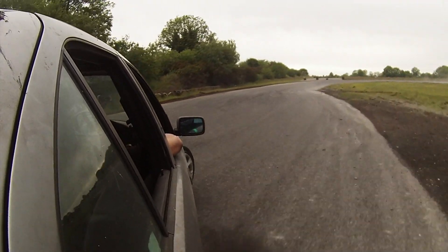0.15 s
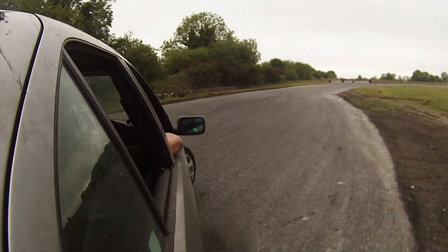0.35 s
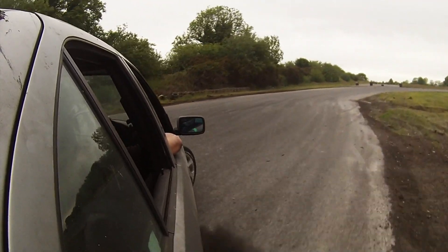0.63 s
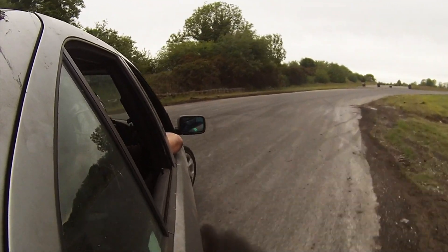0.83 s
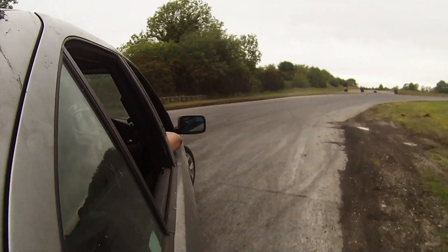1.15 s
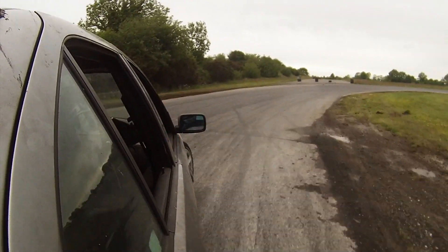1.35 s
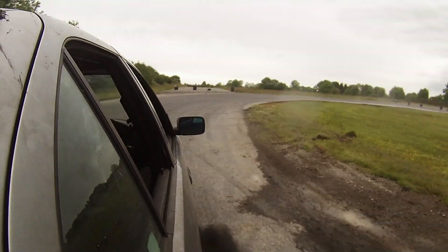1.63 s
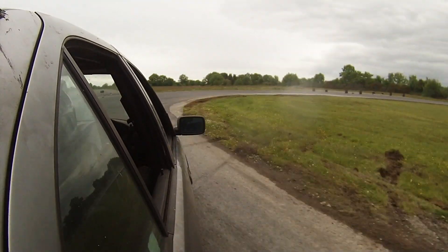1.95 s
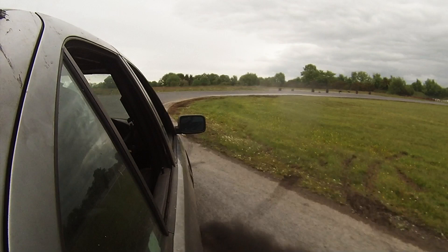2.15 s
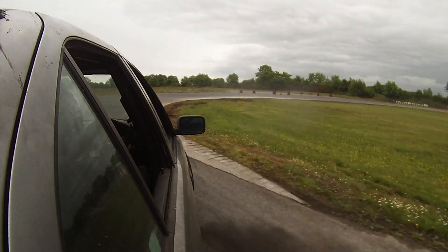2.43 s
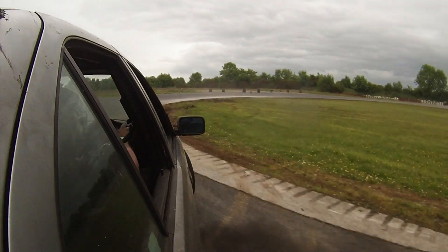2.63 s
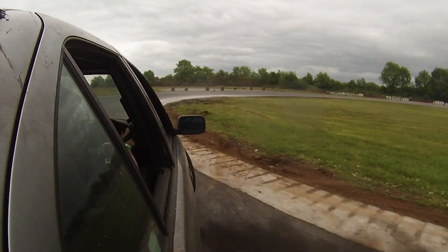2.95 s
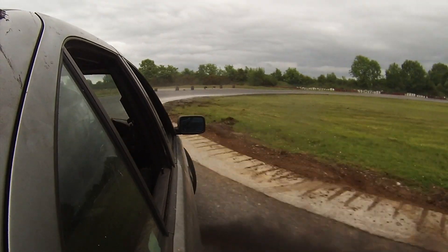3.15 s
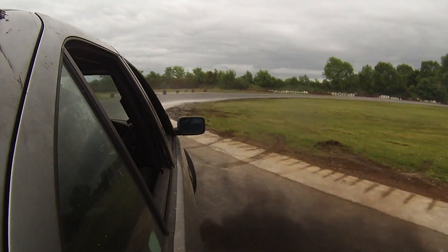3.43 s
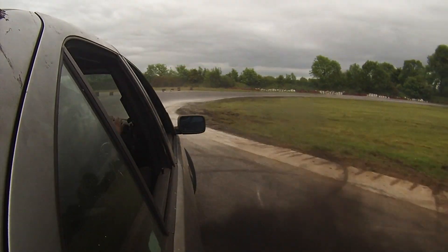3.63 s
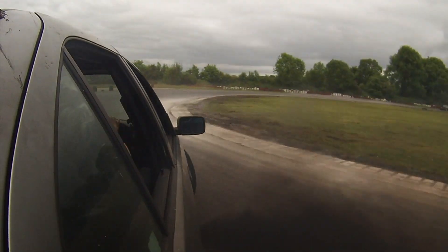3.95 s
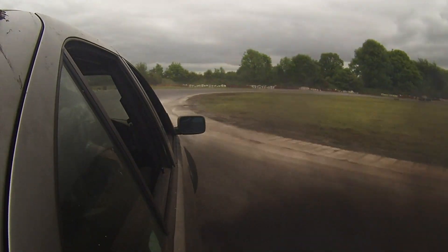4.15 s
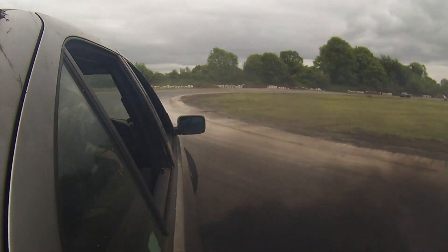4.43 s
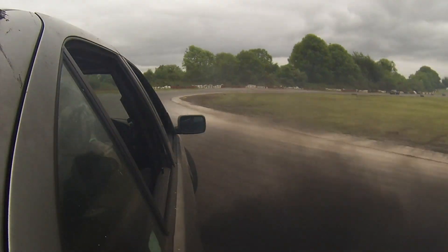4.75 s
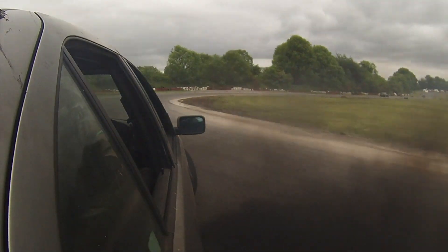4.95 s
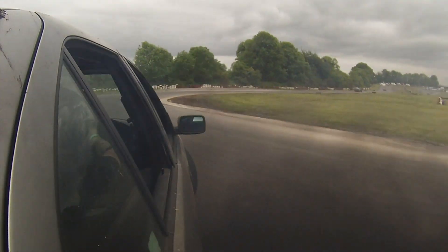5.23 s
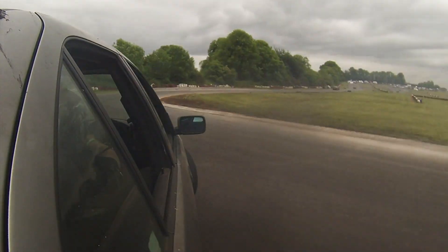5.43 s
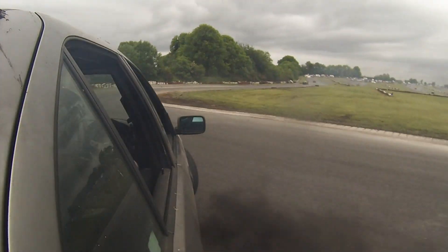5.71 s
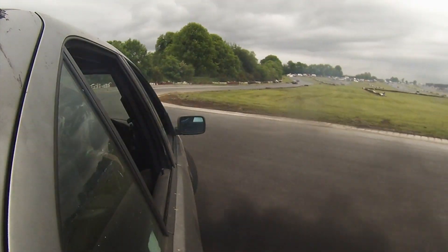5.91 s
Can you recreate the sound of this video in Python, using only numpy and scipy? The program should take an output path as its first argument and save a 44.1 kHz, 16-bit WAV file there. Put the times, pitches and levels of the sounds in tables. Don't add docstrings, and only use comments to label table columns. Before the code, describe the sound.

Close to a sliding car: long harsh tyre squeal, brief grip with squeaks as the diesel drops, then pulsing squeals over engine roar.

```python
import sys
import numpy as np
from scipy import signal
from scipy.fft import rfft, irfft, next_fast_len
from scipy.io import wavfile
from scipy.ndimage import uniform_filter1d

SR = 44100
rng = np.random.default_rng(int(sys.argv[2]) if len(sys.argv) > 2 else 0)


def elevation(decibels):
    levels = np.asarray(decibels, float)
    return 10 ** (levels / 20)


def wav_record(signal):
    frames = np.transpose(np.atleast_2d(signal))
    bounded = np.clip(frames, -1, 1)
    quanta = np.round(bounded * 32767).astype(np.int16)
    wavfile.write(sys.argv[1], SR, quanta)


N = 268128
TIME_S = np.arange(N) / SR


def columns(rows):
    s, *cols = np.transpose(rows)
    return [np.interp(TIME_S, s, c) for c in cols]


def bell(s, length):
    return np.exp(-((TIME_S - s) / length) ** 2)


def sounding(rows):
    inside = 1. * (TIME_S >= rows[0][0]) * (TIME_S <= rows[-1][0])
    return uniform_filter1d(inside, size=900)


def noise():
    return rng.standard_normal(N)


def rms_one(x):
    return x / np.sqrt(np.mean(x ** 2) + 1e-20)


def drift(rate_hz):
    r = np.exp(-2 * np.pi * rate_hz / SR)
    settled = signal.lfilter([1], [1, -2 * r, r * r], rng.standard_normal(N + SR))[SR:]
    return rms_one(settled)


def colour(x, spectrum):
    hz, db = np.transpose(spectrum)
    size = next_fast_len(N)
    log_hz = np.log(np.arange(size // 2 + 1) * SR / size + 1)
    gain = elevation(np.interp(log_hz, np.log(hz), db, -120, -120))
    return rms_one(irfft(rfft(x, size) * gain, size)[:N])


def resonance(x, hz, width_hz):
    r = np.exp(-np.pi * width_hz / SR)
    zeros = np.array([1, 0, -1]) * (1 - r * r) / 2
    return signal.lfilter(zeros, [1, -2 * r * np.cos(2 * np.pi * hz / SR), r * r], x)


def ringing(hz, width_hz):
    return rms_one(resonance(resonance(noise(), hz, width_hz), hz, width_hz))


def channel_difference():
    # f/Hz, level/dB per Hz
    spectrum = [(20, 17), (200, -5), (700, -13.0), (1400, -1), (4000, -25.5), (13000, -28)]
    return elevation(-51 + 3.5 * drift(14.4)) * colour(noise(), spectrum)


# f/Hz, width/Hz, level/dB
PANEL_MODES = [(61.5, 4.2, -6.5), (76.9, 3.06, 2), (90, 10, -6.5), (125.5, 20.3, -5.5), (143, 7.9, -7),
               (210.3, 50, -14)]
# t/s, length/s, extra buffeting level/dB, extra boom level/dB
BUMPS = [(0, 0.051, 12, 4), (0.208, .1, -4, 3), (0.484, 0.03, 10.5, 7), (0.851, 0.11, -5, -0.5),
         (1.05, 0.045, 4.5, 3), (1.526, 0.097, 8, 5.5), (1.305, 0.088, 4.5, 5.5), (1.792, 0.1, 10.5, 3),
         (2.003, 0.16, 4.5, 3), (2.4, 0.14, 6, 2.5), (3.02, 0.14, 6, 6), (3.45, .08, 8.5, -1),
         (3.921, 0.068, 1.5, 5), (4.114, 0.13, 8.5, 1), (4.549, .12, 1, 3), (4.9, 0.17, 3.5, -0.5),
         (5.3, 0.12, -4, -2.5), (5.75, 0.05, -6, 5.5)]


def bodywork():
    buffet_db = -25.5 + sum(db * bell(s, length) for s, length, db, _ in BUMPS)
    boom_db = -24.5 + sum(db * bell(s, length) for s, length, _, db in BUMPS)
    boom = rms_one(sum(elevation(db) * ringing(hz, 2.5 * width_hz) for hz, width_hz, db in PANEL_MODES))
    buffet = ringing(22.7, 2.5 * 6) + 0.28 * ringing(39.0, 2.5 * 17.5)
    return boom * elevation(boom_db + 1.0) + buffet * elevation(buffet_db + 1.5)


MEAN_LOAD_DB = -40.5
# t/s, level/dB
LOAD = [(0, -31.5), (.5, -35.5), (1.0, -35.5), (1.12, -45.5), (1.4, -58.5), (1.62, -52.5), (1.75, -39),
        (1.86, -55.5), (2.25, -43), (2.75, -39.5), (2.95, -39.5), (3.15, -37.5), (3.47, -43), (3.95, -39),
        (4.35, -42), (4.95, -42.5), (5.55, -50), (6.08, -45.5)]
# t/s, length/s, extra load level/dB
SURGES = [(2.44, 0.042, 1.5), (2.74, 0.056, 3), (3.288, .04, 4), (3.629, 0.051, 4), (3.92, .05, 3.5),
          (4.149, 0.028, 0), (4.674, 0.049, 4), (4.97, 0.047, 5), (5.319, 0.045, 0), (5.88, .1, 0.5)]


def load():
    return columns(LOAD)[0] + sum(db * bell(s, length) for s, length, db in SURGES)


# t/s, firing f/Hz, first order level/dB
FIRING = [(0, 190.7, -27), (.25, 173.6, -32.5), (1.05, 162.7, -29), (1.17, 152.3, -38), (1.5, 120.6, -51),
          (1.57, 121.1, -27.5), (1.82, 126, -29.5), (1.92, 129.3, -47), (2.15, 141.4, -21),
          (2.3, 144.9, -20), (2.45, 150.5, -26), (2.7, 165.5, -28.5), (3.1, 165.9, -26), (3.95, 174.2, -26),
          (4.5, 165.5, -26), (5.3, 162.6, -27), (5.65, 143, -23.5), (6.08, 146, -24.5)]
# multiple of the firing rate, level under the first order/dB
OTHER_ORDERS = [(.5, -14), (11 / 6, -16.5), (3, -23.5)]


def engine_orders(cycles):
    firing_hz, first_db = columns(FIRING)
    second_db = -40 + 0.64 * (first_db + 28) - 0.23 * (firing_hz - 150)
    tones = elevation(first_db) * np.sin(2 * np.pi * cycles) + elevation(second_db) * np.sin(4 * np.pi * cycles + 1)
    for multiple, db in OTHER_ORDERS:
        tones += elevation(first_db + db + 2.0 * drift(10.0)) * np.sin(2 * np.pi * multiple * cycles)
    return np.sqrt(2) * tones


# f/Hz, level/dB per Hz
CLATTER = [(2350, -36), (4000, 2), (4370, -2.5), (4740, 0.5), (5800, -7.5), (6240, 4.5), (6570, 5.5),
           (7670, -2), (9570, -12), (10200, -4.5), (10500, -5), (11300, -11.5), (12700, -15.5),
           (13700, -24.5)]


def clatter(cycles, puff, load_db):
    surge_db = 1.1 * drift(13)
    total = 0
    for kind, edge_hz in ("low", 5900), ("band", [5900, 9400]), ("high", 9400):
        strength = elevation(rng.normal(0, 4.2, 1500))[cycles.astype(int)]
        gate = .8 + .75 * strength * puff
        part = colour(gate * noise(), CLATTER) * elevation(load_db + surge_db + 1.74 * drift(31))
        total = total + signal.sosfilt(signal.butter(4, edge_hz, kind, fs=SR, output="sos"), part)
    return total


# f/Hz, level/dB per Hz
ROAR = [(110, -54), (190, 2.5), (236, -8.5), (318, -8.5), (383, -12.5), (459, -13), (650, -20),
        (747, -10.5), (823, -19.5), (1000, -19), (1300, -34), (2200, -120)]


def exhaust_roar(puff, load_db):
    roar_db = -38.5 + 0.3 * (load_db - MEAN_LOAD_DB)
    return colour((0.5 + puff) * noise(), ROAR) * elevation(roar_db + 7.5)


def engine():
    cycles = np.cumsum(columns(FIRING)[0]) / SR
    puff = np.sin(np.pi * cycles) ** 2
    load_db = load()
    orders = engine_orders(cycles)
    bright = clatter(cycles, puff, load_db)
    roar = exhaust_roar(puff, load_db)
    return orders * elevation(1.5 * drift(8)) + bright + roar


# t/s, scrub level/dB
SLIDE = [(0, -25.5), (.3, -25.5), (.9, -28.5), (1.17, -24), (1.43, -31), (1.56, -37.5), (1.63, -40),
         (1.69, -28), (1.95, -29.5), (2.21, -22.5), (2.6, -23.5), (2.95, -25.5), (3.25, -21.5), (3.51, -26),
         (4.6, -22.5), (5.3, -25), (5.65, -21.5), (6.08, -23)]
# f/Hz, level/dB per Hz
DULL_SCRUB = [(500, -62), (850, -34), (1010, -12), (1100, -18), (1190, -8.5), (1270, -1.5), (1320, 0),
              (1360, 1), (1430, -3.5), (1640, -5.5), (1890, -15), (2070, -18), (2400, -14), (3120, -77),
              (5280, -120)]
# f/Hz, level/dB per Hz
BRIGHT_SCRUB = [(1120, -27), (1900, -14.5), (2050, 11.5), (2350, -4.5), (2720, 3), (3160, -1), (3370, -2.5),
                (3830, -13.5), (4130, -12), (4400, -23), (4810, -15.5), (5290, -20.5), (5900, -20),
                (7670, -60), (13000, -120)]
# f/Hz, level/dB per Hz
ROLLING_HISS = [(2500, -15), (3000, -0.5), (5600, -14), (8000, -34)]


def scrub(swell):
    level_db, = columns(SLIDE)
    first_tyre_db = 6.5 * sounding(FIRST_TYRE)
    bright_db = level_db - 3.5 + first_tyre_db + 0.17 * (load() - MEAN_LOAD_DB)
    dull = colour(noise(), DULL_SCRUB) * elevation(level_db + 5.0 + 1.57 * drift(40))
    bright = colour(noise(), BRIGHT_SCRUB) * elevation(bright_db - 1.53 + 2.0 * drift(25))
    grab, tear = 1 + 1.2 * swell, 1 + 1.17 * swell
    hiss = elevation(-49) * colour(noise(), ROLLING_HISS)
    return dull * grab / np.mean(grab) + bright * tear / np.mean(tear) + hiss


# t/s, peak level/dB, length/s, f/Hz, glide/Hz per s
SQUEAKS = [
    (1.22, -19, .013, 1340, 0),
    (1.411, -15.5, .0047, 1780, 4),
    (1.421, -28, .012, 2020, -3),
    (1.44, -25, .028, 1185, 2500),
    (1.6, -36.5, .038, 1540, -900),
    (2.04, -23, .011, 1365, -2),
    (2.22, -29, .07, 2470, 300),
    (2.227, -19.5, .012, 1710, 0),
    (2.26, -30, .021, 1340, -3),
]
# t/s, peak level/dB, length/s, f/Hz, glide/Hz per s
SHUDDERS = [
    (.5, -27, .041, 200, 0),
    (.6, -29, .015, 200, 0),
    (1.37, -26, .047, 198, 0),
    (1.54, -24, .019, 215, 0),
    (1.75, -37, .04, 370, 0),
    (2.0, -33, .04, 225, 0),
]


def squeaks():
    total = 0
    for s, db, length, hz, glide in SQUEAKS + SHUDDERS:
        since = TIME_S - s
        total = total + elevation(db) * bell(s, length) * np.sin(2 * np.pi * (hz + glide * since / 2) * since)
    return total * np.sqrt(2)


def slipping(pitch_hz, harmonics, wander_hz, flutter_db):
    phase = 2 * np.pi * np.cumsum(pitch_hz + wander_hz * drift(69.86)) / SR
    wave = 0
    for k, gain in enumerate(harmonics, 1):
        wave = wave + gain * elevation(flutter_db * drift(80)) * np.cos(k * phase)
    return wave * np.sqrt(2)


# t/s, slip f/Hz, level/dB
FIRST_TYRE = [(0, 1092, -20), (.05, 1062, -19.5), (.35, 1036, -17.5), (.54, 1039, -20), (.9, 1057, -15.5),
              (1.19, 1078, -17.5), (1.31, 1028, -16), (1.47, 1072, -25.5), (1.56, 1183, -44)]


def first_tyre():
    pitch_hz, level_db = columns(FIRST_TYRE)
    pitch_hz = pitch_hz + 7 * drift(31.4)
    level_db = level_db + 1.2 * drift(35)
    octave_db = level_db - 0.5 - 5.5 * TIME_S + 0.65 * drift(2.6)
    octave = elevation(octave_db) * (1.0 + .5 * drift(150))
    harmonics = [elevation(level_db), octave, elevation(octave_db - 13)]
    tone = slipping(pitch_hz, harmonics, wander_hz=18, flutter_db=3.5)
    return sounding(FIRST_TYRE) * (tone + elevation(octave_db - 14.5) * ringing(3260, 70))


# t/s, slip f/Hz, held level/dB, rough octave level/dB
SECOND_TYRE = [(1.58, 1501, -41, -56.5), (1.68, 1410, -35.5, -47), (1.75, 1217, -21.5, -33.5),
               (1.96, 1198, -25.5, -29), (2.2, 1233, -15.5, -33.5), (2.36, 1269, -25, -28.5),
               (2.6, 1323, -20.5, -33.5), (3.1, 1298, -20.5, -45), (3.5, 1321, -24, -45),
               (3.9, 1350, -27.5, -28.5), (4.4, 1313, -19.5, -41), (4.68, 1289, -18, -38),
               (4.95, 1325, -21, -35.5), (5.3, 1340, -18.5, -37.5), (5.5, 1321, -14, -29),
               (5.72, 1240, -18.5, -27), (5.86, 1262, -16.5, -28.5), (6.08, 1278, -21.5, -30.5)]
# t/s, peak level/dB, length/s
GRABS = [(1.705, -17, 0.02494), (2.498, -18.5, 0.03), (2.585, -13, 0.025), (2.66, -14.5, 0.034),
         (2.754, -15, .04), (2.835, -13.5, 0.041), (2.99, -14.5, 0.024), (3.095, -17.5, 0.028),
         (3.174, -15, .03), (3.315, -10.5, 0.022), (3.392, -17, .024), (3.493, -12, 0.025),
         (3.559, -13, .018), (3.622, -10, 0.023), (3.709, -12, 0.02), (3.783, -11, 0.0193),
         (4.015, -15, 0.0205), (4.193, -15.5, 0.032), (4.25, -12.5, 0.014), (4.331, -13, 0.039),
         (4.434, -15.5, .035), (4.495, -12.5, 0.023), (4.554, -14.5, 0.026), (4.812, -11.5, 0.027),
         (5.078, -14, .04), (5.148, -13.5, .022), (5.235, -11.5, 0.04), (5.308, -12.5, .032),
         (5.391, -12.5, 0.028), (5.587, -13, 0.02)]


def second_tyre():
    pitch_hz, level_db, octave_db = columns(SECOND_TYRE)
    on = sounding(SECOND_TYRE)
    swell = np.max([elevation(db) * bell(s, .745 * length) for s, db, length in GRABS], axis=0)
    let_go = np.max([bell(s, 0.04488) for s, _, _ in GRABS], axis=0)
    held = on * elevation(level_db - 12 * let_go + 1.76 * drift(22))
    grab = swell / (swell + held + 1e-6)
    octave = on * elevation(octave_db) * (0.4 + drift(230)) + elevation(-24.5) * swell
    pitch_hz = pitch_hz + 25.03 * (grab - .6) + 5 * drift(20)
    tread = ringing(2760, 190) * elevation(-17.5) * (swell + 0.84 * held)
    harmonics = [np.hypot(held, swell), octave]
    tone = slipping(pitch_hz, harmonics, wander_hz=22 - 16 * grab, flutter_db=2.5 - 0.7 * grab)
    return tread + tone, swell


def scene():
    second, swell = second_tyre()
    mono = first_tyre() + second + squeaks() + scrub(swell) + engine() + bodywork()
    side = channel_difference()
    return np.array([mono + side, mono - side])


def low_pass(x):
    return signal.sosfilt(signal.butter(12, 13890, fs=SR, output="sos"), x)


# f/Hz, width/Hz
CASE_NOTCHES = [(5880, 210), (9400, 61), (10950, 230)]


def record(dry):
    for hz, width_hz in CASE_NOTCHES:
        dry = dry - 0.39 * resonance(dry, hz, width_hz)
    cut = signal.sosfilt(signal.butter(2, 16, "high", fs=SR, output="sos"), dry)
    return low_pass(1.223 * np.tanh(cut / 1.323))


dry = scene()
out = record(dry)
wav_record(out)
```